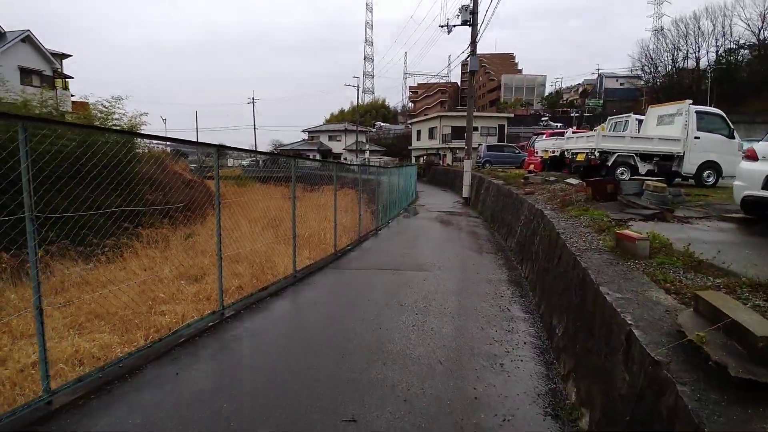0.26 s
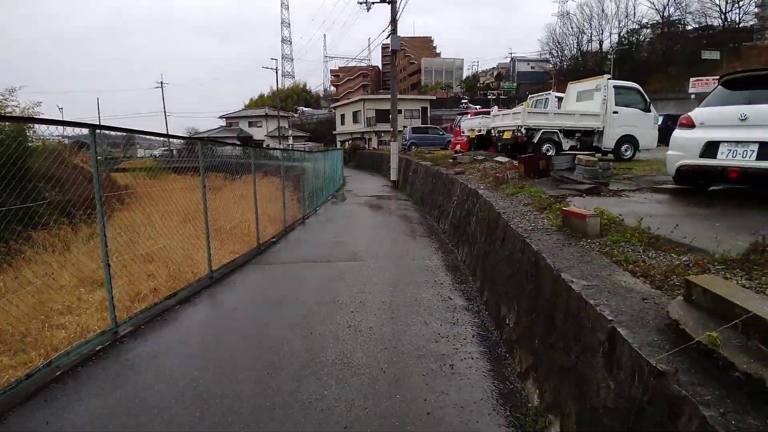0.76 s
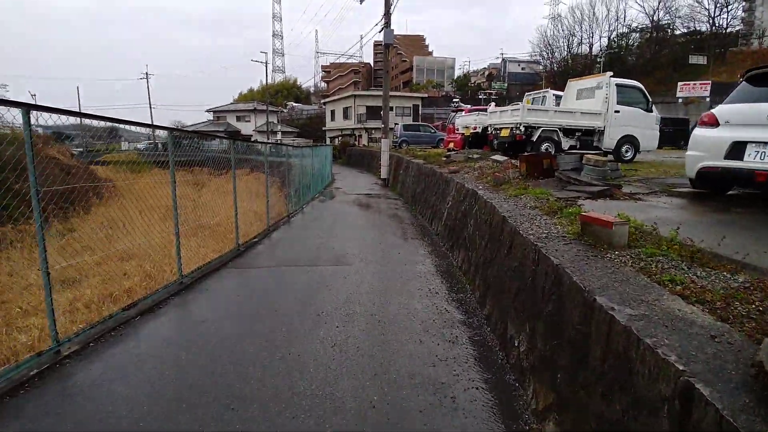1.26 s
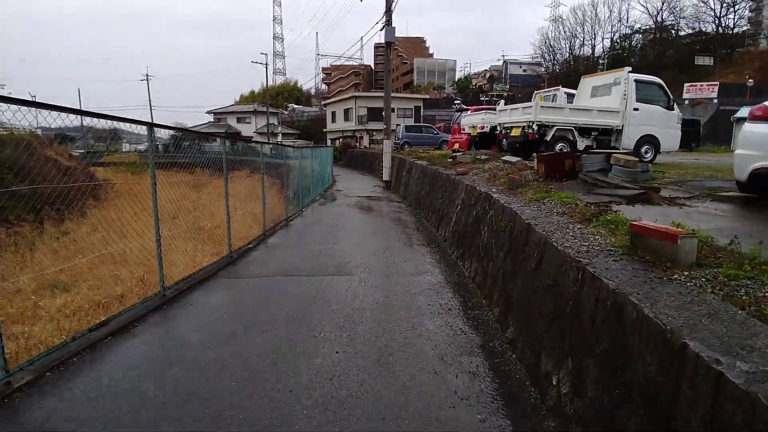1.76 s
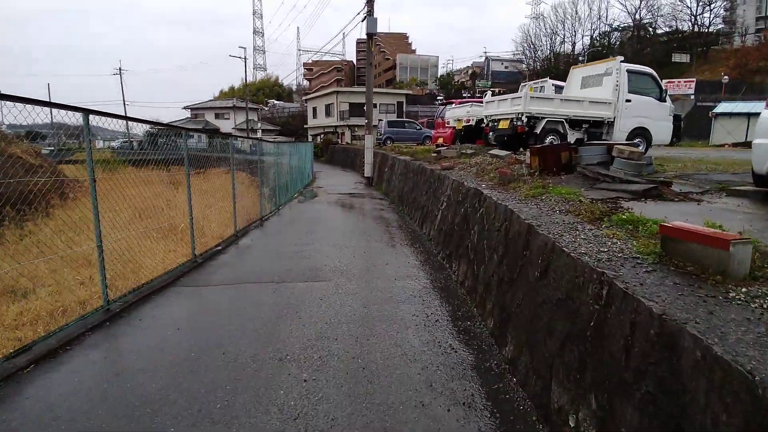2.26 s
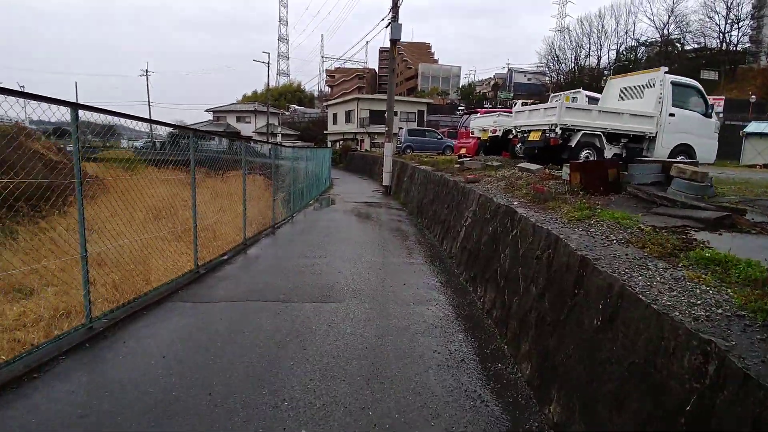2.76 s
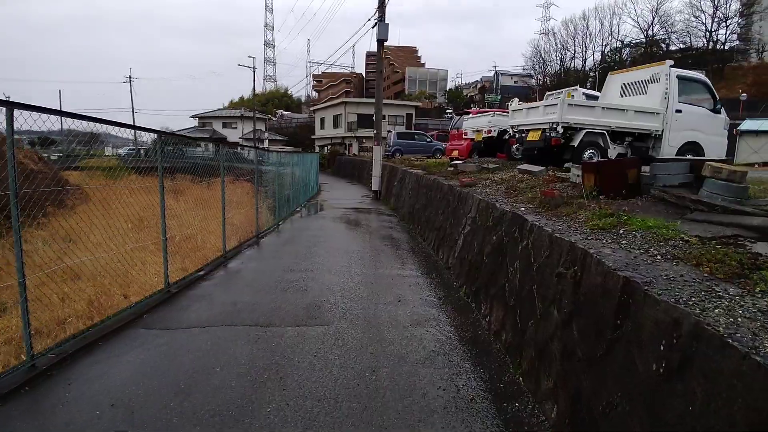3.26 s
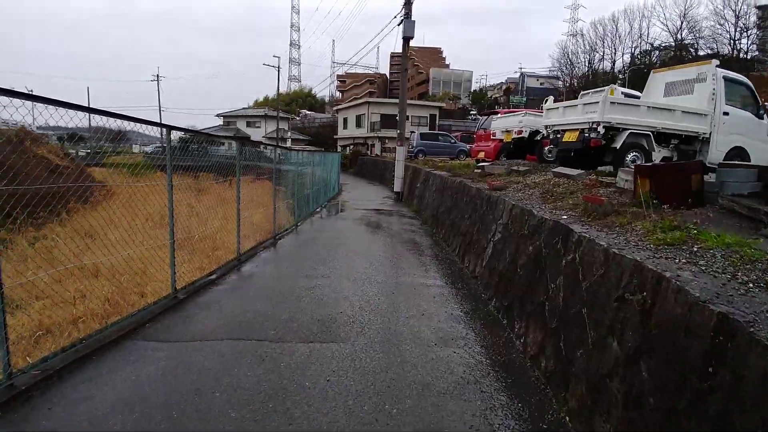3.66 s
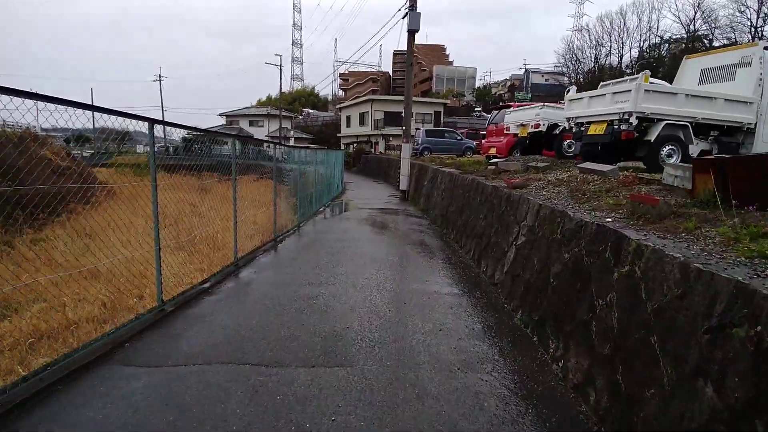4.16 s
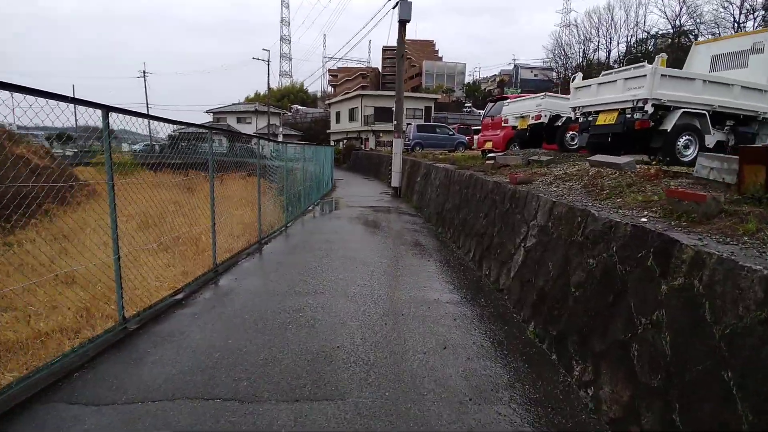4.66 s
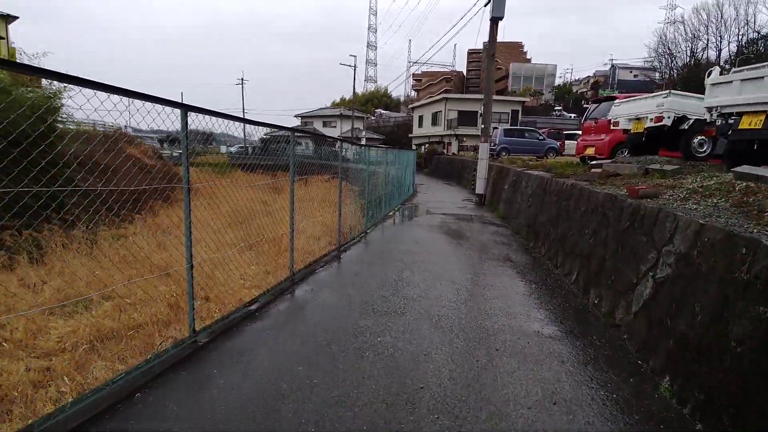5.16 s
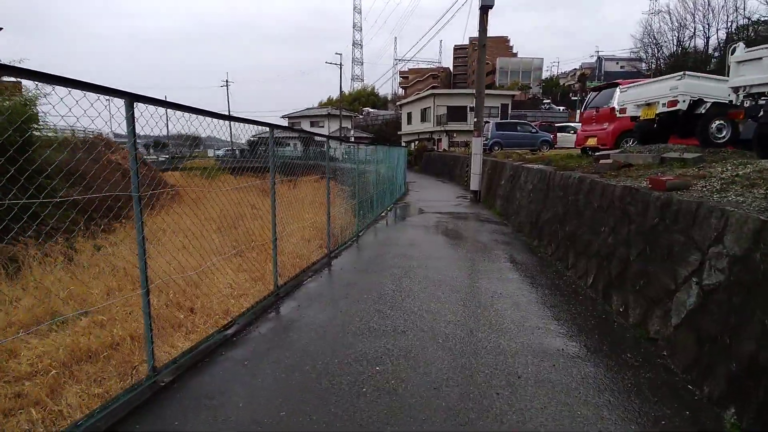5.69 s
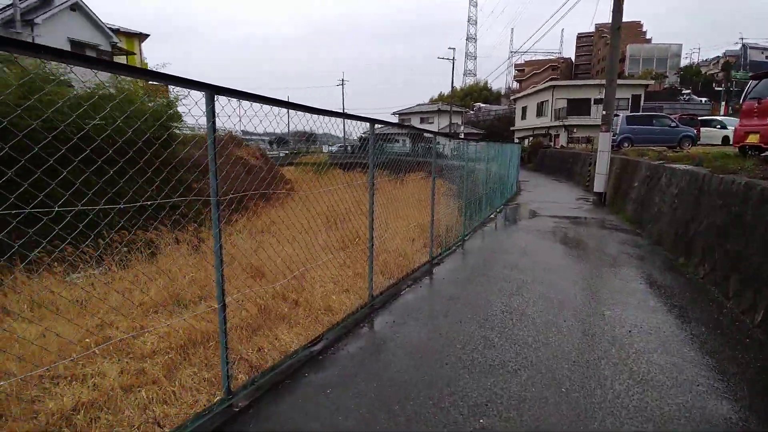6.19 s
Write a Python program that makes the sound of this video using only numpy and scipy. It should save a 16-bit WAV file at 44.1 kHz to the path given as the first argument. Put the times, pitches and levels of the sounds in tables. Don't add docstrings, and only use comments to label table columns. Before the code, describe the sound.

A handheld stereo microphone moves along a wet path in light rain. From 0 s a broad, low roar is already close, with rumble, a brief left-side wind buffet and heavy drops knocking on the casing. From about 0.9 s watery wash and bright spray grow, cresting around 2.1-2.3 s with short hollow swells and a strong knock. The rush then pulls away, losing its hiss by 3.5 s and gone by about 4.6 s. Throughout, a low springy thud with small ticks sounds on the left about every 0.6 s, at 0, 0.6, 1.3, 2.2, 2.8, 3.5, 4.0, 4.6, 5.2, 5.9 and 6.4 s, softer after 4 s. Soft sole pats and gritty scuffs accompany many steps. The quiet ending exposes crisp drops on the right, fewer on the left, fine pattering and faint town hum.

```python
import sys
import numpy as np
from scipy import signal
from scipy.fft import rfft, irfft, next_fast_len
from scipy.io import wavfile
from scipy.ndimage import uniform_filter1d, map_coordinates

SR = 44100
rng = np.random.default_rng(int(sys.argv[2]) if len(sys.argv) > 2 else 0)


def rack_gain(trim_db):
    fader = np.asarray(trim_db, float)
    return 10 ** (fader / 20)


def persist_wave(psi):
    counts = np.round(np.clip(psi, -1, 1) * 32767).astype(np.int16)
    wavfile.write(sys.argv[1], SR, np.atleast_2d(counts).T)


N = 283563

# t/s, roar level/dB as it nears and leaves, spray level/dB as it comes into the open
RUSH = [(0, -39, -75), (.3, -36.5, -70), (.52, -35.5, -69.5), (.6, -35, -74), (.81, -35, -70.5),
        (.91, -35, -59.5), (1.06, -34.5, -58), (1.3, -35.5, -46.5), (1.7, -37.5, -45), (2.08, -35.5, -38),
        (2.24, -35.5, -36.5), (2.59, -39.5, -42), (2.84, -40, -44), (3.06, -40.5, -44.5), (3.3, -46.5, -46),
        (3.56, -46, -53.5), (3.68, -50.5, -61.5), (3.83, -61.5, -64), (4.2, -58, -68), (4.5, -69, -65)]
# f/Hz, density/dB per Hz
SPRAY = [(3240, -35), (5500, -16), (5990, -1.5), (6610, -1), (10100, 3), (12700, -9), (15200, -32),
         (16000, -41)]
# f/Hz, correlation
RUSH_ALIKE = [(60, 0.85), (300, 0.98), (800, 0.87), (1200, 0.66), (2000, 0.85), (3000, 0.21), (9000, 0.45),
              (14000, .2)]
# f/Hz, level/dB
RUSH_BALANCE = [(60, 3), (110, 0.5), (200, 0), (380, -0.5), (700, 0.0), (1290, 2.5), (2380, -6.5),
                (4400, -14), (8120, -28.5), (15000, -22)]
# f/Hz, phase/rad
RUSH_LEAD = [(400, 0.22), (1100, -0.97), (2000, -2), (3000, -1.5), (14000, -2.5)]
PORTS = RUSH_ALIKE, RUSH_BALANCE, RUSH_LEAD


def unit(x):
    return x / np.sqrt(np.mean(x ** 2) + 1e-20)


def along(points, hz):
    f, v = np.transpose(points)
    return np.interp(np.log(hz + 1), np.log(f + 1), v)


def curves(rows):
    s, *cols = np.transpose(rows)
    return [np.interp(np.arange(N) / SR, s, c) for c in cols]


def wobble(rate):
    knots = rng.standard_normal(int(N * rate / SR) + 4)
    return map_coordinates(knots, [np.arange(N) * rate / SR])


def sides(pan_db):
    left = rack_gain(pan_db)
    return 2 * np.array([left, np.ones_like(left)]) / (1 + left)


def add(out, s, sound):
    k = round(s * SR)
    part = sound[:, max(-k, 0):][:, :N - max(k, 0)]
    out[:, max(k, 0):max(k, 0) + part.shape[1]] += part


def band(x, lo_hz, hi_hz):
    return signal.sosfilt(signal.butter(2, [lo_hz, hi_hz], "bandpass", fs=SR, output="sos"), x)


def rush(spectrum, alike, balance, lead, patchy_db, grain_db):
    grainy = rng.standard_normal((2, N)) * rack_gain(grain_db * wobble(450))
    z = signal.stft(grainy, nperseg=512)[2]
    field = uniform_filter1d(rng.standard_normal(z.shape[1:]), size=6, axis=0)
    field = uniform_filter1d(field, size=12, axis=1)
    pair = signal.istft(z * rack_gain(patchy_db * unit(field)), nperseg=512)[1][:, :N]
    m = next_fast_len(N + 8192)
    hz = np.fft.rfftfreq(m, 1 / SR)
    a, b = rfft(pair, m) * rack_gain(along(spectrum, hz))
    turn = np.arccos(np.clip(along(alike, hz), 0, 1)) / 2
    shared, own = a * np.cos(turn), b * np.sin(turn)
    shift = np.exp(.5j * along(lead, hz))
    ports = sides(along(balance, hz)) * [(shared + own) * shift, (shared - own) / shift]
    smooth = lambda v: uniform_filter1d(np.abs(v), size=999) + 1e-9
    ports *= smooth(a) / smooth(ports.mean(0))
    out = irfft(ports, m)[:, :N]
    return out / np.std(out.mean(0))


def drizzle():
    # f/Hz, density/dB per Hz
    floor_colour = [(76, -11), (130, 1), (172, -4.5), (238, 2.5), (363, -6.5), (511, -8), (863, -14.5),
                    (1320, -14), (1490, -16), (2890, -23.5), (4880, -26), (5620, -32), (9870, -26.5),
                    (12800, -33), (16000, -39)]
    # f/Hz, correlation
    quiet_alike = [(60, 0.49), (130, 0.64), (290, 0.94), (640, 0.26), (1410, -1.3), (3100, 0.35),
                   (6820, 0.081), (15000, -0.11)]
    # f/Hz, level/dB
    quiet_balance = [(60, 6.0), (110, -3), (200, 5.5), (380, -1), (700, 2), (1290, 1), (2380, -2.5),
                     (4400, -12), (8120, -15.5), (15000, -10)]
    roar_db, spray_db = curves(RUSH)
    lift_db = 0.098 * (roar_db - roar_db[-1]) + np.clip(spray_db - spray_db[-1], 0, 7)
    level_db = -59 + lift_db + 0.44 * wobble(2.85) + .5 * wobble(25)
    noise = rush(floor_colour, quiet_alike, quiet_balance, RUSH_LEAD, patchy_db=1.5, grain_db=2.0)
    return rack_gain(level_db) * noise


def hollow():
    # f/Hz, density/dB per Hz
    cavity = [(520, -34), (660, -10), (750, 2), (840, -12), (1050, -43)]
    # t/s, level/dB, half length/s
    cavity_swells = [
        (1.64, -47, .04),
        (1.772, -40, 0.049),
        (1.93, -49, .07),
        (2.062, -36.5, 0.063),
        (2.22, -46, 0.042),
        (2.292, -40, 0.027),
        (2.52, -47.5, .08),
        (2.85, -46.5, 0.065),
        (2.97, -46.5, .05),
        (3.205, -49, .1),
    ]
    now = np.arange(N) / SR
    swells = sum(rack_gain(db) * np.exp(-((now - s) / half) ** 2) for s, db, half in cavity_swells)
    return swells * rush(cavity, *PORTS, patchy_db=-1.0, grain_db=2.8)


def rumble():
    # f/Hz, density/dB per Hz
    low_colour = [(12, -54), (20, -46), (43, -13), (63, -9), (75, 4), (170, -9), (220, -27), (370, -120)]
    # t/s, level/dB, half length/s
    puff_times = [(0, -36, 0.018), (2.297, -46, 0.097), (2.743, -60, 0.046), (2.952, -51, 0.033),
                  (3.17, -62, 0.089), (3.3, -64, .06), (3.55, -56, 0.043), (3.72, -55.5, 0.031),
                  (3.92, -62, .05), (4.188, -65, 0.074), (4.71, -82, .12), (5.245, -66.5, 0.12),
                  (5.52, -72, .05), (5.63, -63, 0.057), (6.1, -68, 0.074), (6.27, -68, .05),
                  (.49, -46, .03), (1.4, -52, 0.041), (3.066, -53, 0.034), (2.0, -48.5, 0.057),
                  (1.15, -45, .03), (5.374, -66, .04), (5.78, -67, 0.051), (5.943, -57, 0.041),
                  (6.43, -62, 0.11)]
    now = np.arange(N) / SR
    far = rack_gain(np.maximum(-48 - 18.5 * np.clip(now - 1.94, 0, None), -73))
    puffs = sum(rack_gain(db) * np.exp(-((now - s) / half) ** 2) for s, db, half in puff_times)
    lumps = rack_gain(3.0 + 1.7 * wobble(12)) * np.hypot(far, puffs * sides(18)[:, None])
    alike, balance, lead = [(30, 0.14), (100, 0.94)], [(60, 0)], [(60, 0.0053)]
    return lumps * rush(low_colour, alike, balance, lead, patchy_db=-0.5, grain_db=1.5)


def plinks():
    # t/s, peak level/dB, pitch f/Hz
    ringing = [(.133, -54, 4600), (.5165, -45, 6000), (.595, -52, 6500), (.317, -43, 3000),
               (.438, -49, 3300), (.516, -38, 2600), (2.856, -32, 1800), (2.86, -33, 2500),
               (3.061, -35, 2750), (2.966, -39, 3000), (2.852, -32, 2230), (5.297, -51, 2500),
               (5.31, -52, 2200), (3.285, -42, 2500), (3.513, -35, 2260), (4.170, -55, 2500),
               (4.390, -57, 2200), (4.6536, -53, 1600), (4.677, -56, 2300), (4.8566, -52, 1700),
               (4.8945, -51, 4220), (4.980, -58, 2600), (5.342, -53, 1090), (5.352, -51, 1540),
               (5.482, -55, 2000), (5.591, -52, 1900), (5.972, -56, 1210), (6.308, -56, 1420),
               (6.403, -48, 1860)]
    # t/s, peak level/dB, pitch f/Hz
    heavy = [(0.478, -26, 700), (0.617, -20, 816), (0.646, -28, 864), (0.735, -25, 746), (0.82, -27, 1080),
             (0.852, -28, 880), (1.148, -25, 773), (1.311, -20, 713), (1.344, -22, 783), (1.398, -21, 1530),
             (1.478, -35.5, 633), (1.87, -27, 719), (2.041, -40, 716), (2.077, -16, 773), (2.176, -34, 689),
             (2.686, -31, 692), (2.911, -33, 711), (3.334, -38, 1040), (3.438, -38, 657), (3.563, -53, 694)]
    out, t = np.zeros((2, N)), np.arange(SR // 30) / SR
    for s, db, hz in ringing:
        decay = rack_gain(-60 * t * hz / 22)
        note = np.sin(2 * np.pi * hz * t) * decay * (1 - np.exp(-t * hz * 1.5))
        add(out, s, rack_gain(db + 1.5) * sides(-5)[:, None] * note)
    for s, db, hz in heavy:
        knock = np.sin(2 * np.pi * hz * t) * rack_gain(-60 * t * hz / 13.0)
        add(out, s, rack_gain(db - 8.0) * sides(1.5)[:, None] * knock)
    return out


def steps():
    # t/s, peak level/dB, pitch f/Hz, left over right level/dB
    contacts = [(0.48, -27, 297, 8), (1.396, -18, 467, -4), (2.859, -24, 700, 13), (3.07, -37, 280, -0.5),
                (3.64, -32, 252, 14), (3.903, -34.5, 130, 20), (3.907, -33, 433, 12), (4.067, -38, 213, 10),
                (4.154, -39, 118, 24), (4.209, -46, 118, 7), (4.635, -30.5, 500, 2.5),
                (4.637, -41, 1140, 0), (4.69, -40, 660, 3), (4.72, -42, 560, 4), (4.701, -37.5, 190, 16),
                (4.845, -40, 150, 12), (4.924, -42.5, 514, 1.0), (5.24, -47, 188, 12.5),
                (5.299, -37, 243, 2.5), (5.874, -33.5, 468, 2.5), (5.877, -46, 1200, 0),
                (5.949, -38, 111, 10)]
    # t/s, length/s, dull level/dB, bright level/dB
    scuffs = [(0, 0.019, -48, -64), (1.168, .035, -70, -51.5), (1.663, .014, -55, -45),
              (5.96, .02, -75, -70), (1.398, 0.019, -38.5, -44), (1.403, 0.027, -38, -48),
              (2.856, 0.011, -43, -62), (3.061, 0.0076, -36.5, -57), (3.647, 0.044, -52.5, -68),
              (4.059, 0.049, -58, -76), (4.243, 0.047, -83, -70), (4.628, 0.03, -61, -75),
              (4.588, .025, -65, -80), (5.218, .022, -65, -80), (5.842, .015, -62, -82),
              (6.374, .025, -65, -80), (5.293, 0.037, -58, -75), (5.302, 0.06, -72, -69),
              (5.24, 0.029, -64, -76), (5.856, 0.045, -59, -66.5), (6.358, .05, -72, -81)]
    # f/Hz, density/dB per Hz
    dull_grit = [(200, -14), (600, 2), (1300, -3.5), (2400, -4), (3300, -14), (4500, -17), (6500, -24),
                 (9000, -40)]
    out, t = np.zeros((2, N)), np.arange(SR // 12) / SR
    for s, db, hz, pan_db in contacts:
        decay = rack_gain(-60 * t * hz / 9)
        pat = np.sin(2 * np.pi * hz * t) * decay * (1 - np.exp(-t * hz * 3))
        add(out, s, rack_gain(db - 2.5) * sides(pan_db)[:, None] * pat)
    grit = np.array([rush(colour, *PORTS, patchy_db=2, grain_db=5) for colour in (dull_grit, SPRAY)])
    now = np.arange(N) / SR
    press = np.zeros((2, N))
    for s, length, *db in scuffs:
        press += rack_gain(db)[:, None] * np.sin(np.pi * np.clip((now - s) / length, 0, 1) ** .55)
    return out + (press[:, None] * grit).sum(0)


def right_drops():
    # t/s, peak level/dB, body level/dB, body f/Hz
    near = [(.1367, -47, 4, 1310), (.3158, -39, -4, 1480), (.4376, -43, -1, 1370), (1.6697, -37, 2, 1300),
            (2.8538, -39, 4, 2250), (2.9107, -33, -7, 1290), (3.1365, -28, -7, 2280),
            (3.6217, -36, 0, 2730), (3.6661, -39.5, 4.5, 2690), (3.697, -44.5, 2, 1320),
            (4.0627, -46, 0, 1410), (4.1924, -42.5, -3, 1270), (4.2128, -45, 0.5, 1580),
            (4.4454, -40, -3.5, 1280), (4.6112, -44, -1, 1500), (4.722, -38.5, -5.5, 1480),
            (4.7533, -51, 2, 1500), (4.9384, -53, 3, 1730), (5.0358, -48.5, 2, 1770),
            (5.1182, -47, -2, 1430), (5.162, -48, -2, 1950), (5.2964, -58, 12.5, 2420),
            (5.3066, -43, 0, 1500), (5.449, -50, 2.5, 1740), (5.573, -52, 4, 1420), (5.7433, -51, 1, 1450),
            (6.0348, -50, 5, 2020), (6.1485, -50.5, 5, 1800), (6.2477, -48, 0, 1450),
            (6.356, -46, -3, 1400)]
    # t/s, peak level/dB
    lighter = [(.2112, -45), (.4748, -43), (.5157, -50), (.5892, -43), (.7612, -47), (1.174, -42),
               (1.496, -28), (1.7459, -35), (3.0604, -39), (3.2714, -30), (3.8183, -41), (3.91, -43.5),
               (4.1265, -44), (4.2388, -43), (4.2657, -46), (4.2784, -51), (4.352, -46), (4.5496, -51),
               (4.821, -51), (4.9328, -42), (4.9444, -47), (4.9641, -49), (5.138, -49), (5.1836, -52),
               (5.5228, -51), (5.5824, -54), (5.8564, -45), (6.0442, -48), (6.2155, -48), (6.2503, -50),
               (.1216, -56), (.1326, -50), (.2044, -52), (.2484, -53), (.3655, -50), (.5432, -49),
                (.6044, -49), (.67, -54), (.68, -54), (.7705, -52), (.7871, -51), (4.2574, -54),
                (4.3011, -53), (4.335, -53), (4.3604, -54), (4.3894, -53), (4.6528, -51), (4.6718, -57),
                (4.68, -55), (4.7124, -55), (4.8264, -55), (4.9794, -51), (5.0244, -56), (5.1704, -53),
                (5.3514, -56), (5.4814, -59), (5.5904, -54), (5.6315, -51), (5.7244, -60), (5.8032, -52),
                (5.9894, -60), (6.0514, -52), (6.1014, -58), (6.3076, -57), (6.342, -53), (6.3684, -58),
                (6.4024, -60)]
    out, t = np.zeros((2, N)), np.arange(SR // 70) / SR
    to_peak = lambda v: v / np.abs(v).max(-1, keepdims=True)
    faint = rng.random((round(10 * N / SR), 2)) * [N / SR, 3] + [0, -67]
    light = np.vstack([lighter, faint])
    vary = rng.standard_normal((len(light), 2))
    body_dbs, body_hzs = -10 + 3 * vary[:, 0], 1450 * np.exp(.12 * vary[:, 1])
    every = np.vstack([near, np.c_[light, body_dbs, body_hzs]])
    burst = rack_gain(-60 * t / 0.0031) + 0.14 * rack_gain(-60 * t / 0.028)
    hiss = rng.standard_normal((len(every), 2, len(t))) * burst
    splats = to_peak(band(band(hiss[:, 0], 6700, 12300), 4500, 14500))
    fizzes = to_peak(band(hiss[:, 1], 700, 4200))
    for (s, db, body_db, hz), splat, fizz in zip(every, splats, fizzes):
        body = np.sin(2 * np.pi * hz * t) * rack_gain(-60 * t / 0.0078) + 1.23 * fizz
        add(out, s + 0.00036, rack_gain(db) * sides(-25)[:, None] * splat)
        add(out, s + 0.000966, rack_gain(db + body_db - 2.5) * sides(-12)[:, None] * body)
    return out


def fine_drops():
    when, size, sign = rng.random((round(110 * N / SR), 3)).T
    clicks = rack_gain(-56.5 + 13.0 * size ** 3) * np.sign(sign - .5)
    fine = np.bincount((when * N).astype(int), clicks, N)
    return band(band(fine, 2500, 11500), 1500, 13000) * sides(-16)[:, None]


def left_drops():
    # t/s, peak level/dB, pitch f/Hz, body level/dB
    housing_drops = [
        (1.5, -52, 9500, -17),
        (2.25, -41.5, 7000, -10),
        (2.89, -40, 8500, -4),
        (4.17, -38, 11000, -9),
        (4.784, -51, 11000, -13),
        (5.04, -56, 7500, -6),
        (5.392, -48, 10500, -10),
        (5.98, -60, 11000, -10),
    ]
    out, t = np.zeros((2, N)), np.arange(SR // 70) / SR
    for s, db, hz, body_db in housing_drops:
        tick = np.sin(2 * np.pi * hz * t) + rack_gain(body_db) * np.sin(2 * np.pi * 2200 * t)
        add(out, s, rack_gain(db - 60 * t / 0.0022) * (1 - np.exp(-t / .0001)) * tick * [[1], [.2]])
    return out


def sprung_mass():
    # t/s, level/dB
    swing_times = [(-.0036, -6), (0.6384, -5.5), (1.255, -4), (2.1607, -5), (2.785, -5), (3.452, -7),
                   (4.0404, -13), (4.5987, -15.5), (5.229, -16.5), (5.852, -15.5), (6.3818, -14)]
    out = np.zeros((2, N))
    t = np.arange(-SR // 50, SR // 4) / SR
    bell = lambda s, width: np.exp(-.5 * ((t - s) / width) ** 2)
    tone = lambda hz, s: np.cos(2 * np.pi * hz * (t - s))
    started = np.clip((t + .013) / .002, 0, 1)
    swing = .95 * started * bell(.0019, .0059) * tone(207, .0022)
    knock = -.09 * bell(0.00066, .0022) * tone(480, 0) + 0.038 * bell(0.0163, 0.0015) * tone(550, 0)
    late = np.clip(t - .013, 0, None)
    swell = 1 - np.exp(-late / .004)
    free = -.17 * swell * rack_gain(-60 * late / 0.037) * tone(196, .0206)
    drift = np.cumsum(rng.standard_normal(len(t))) / 90
    shell = 0.042 * swell * rack_gain(-60 * late / .5) * np.sin(2 * np.pi * 240 * late + drift)
    tick = lambda s: (t > s) * rack_gain(-60 * np.abs(t - s) / 0.0012) * np.sin(2 * np.pi * 1700 * (t - s))
    ticks = band(0.092 * tick(-0.014) + 0.24 * tick(0) + 0.099 * tick(0.015), 460, 3100)
    sound = swing + knock + free + shell
    for s, db in swing_times:
        add(out, s + t[0], (rack_gain(db) * sound + rack_gain(.4 * db - 8) * ticks) * [[1], [.004]])
    return out


def roar(gust):
    # f/Hz, density/dB per Hz
    coming = [(76, -25), (130, -2), (155, -5.5), (284, -1), (371, -7), (590, -7), (1200, -8.5), (1520, -10),
              (1810, -28.5), (2100, -27.5), (2730, -32), (4620, -120)]
    abreast = [(76, -37), (130, -11.5), (182, -11.5), (274, -1), (362, -8.5), (590, -6.5), (728, -5),
               (1550, -13.5), (1830, -24), (2100, -19.5), (2730, -28), (4620, -120)]
    leaving = [(76, -39), (130, -15), (178, -11), (244, 5.5), (322, -7), (431, 0), (597, -7.5), (737, -4),
               (1590, -17), (2100, -29), (2730, -74), (4620, -120)]
    # t/s, power share of coming, of abreast, of leaving
    stages = [
        (0, 1, 0, 0),
        (1.3, 1, 0, 0),
        (1.9, 0, 1, 0),
        (2.5, 0, 1, 0),
        (3.0, 0, 0, 1),
    ]
    roar_db, _ = curves(RUSH)
    noise = np.zeros((2, N))
    for share, colour in zip(curves(stages), (coming, abreast, leaving)):
        noise += np.sqrt(share) * rush(colour, *PORTS, patchy_db=1.5, grain_db=1.5)
    return rack_gain(roar_db + 1.5 + gust + 0.63 * wobble(23.71)) * noise


def wash(gust):
    # f/Hz, density/dB per Hz
    wash_colour = [(1060, -34), (1800, -13), (2000, -13), (2170, -4.5), (2390, -2.5), (2760, 2),
                   (3400, -12), (4420, -52), (7480, -120)]
    roar_db, spray_db = curves(RUSH)
    knee_db, soft_db = -59, 3.5
    under = soft_db * np.logaddexp(0, (knee_db - spray_db) / soft_db)
    wash_db = -48 - under + 0.14 * (spray_db - spray_db.max()) + 0.34 * (roar_db - roar_db.max())
    level = rack_gain(wash_db - 0.5 + gust + 0.5 * wobble(25.45))
    return level * rush(wash_colour, *PORTS, patchy_db=1.6, grain_db=2.0)


def mist(gust):
    # f/Hz, density/dB per Hz
    mist_colour = [(2800, -11.5), (3300, -2), (4300, -3.5), (5600, -2), (6600, -30)]
    now = np.arange(N) / SR
    _, spray_db = curves(RUSH)
    mist_db = -49.5 + 0.72 * (spray_db - spray_db.max()) - 1.67 * now
    haze = rack_gain(-69.5) * np.clip(now - 1.5, 0, 1)
    level = np.hypot(rack_gain(mist_db), haze) * rack_gain(1.5 + gust + 0.48 * wobble(30.4))
    return level * rush(mist_colour, *PORTS, patchy_db=0.6, grain_db=0.8)


def spray(gust):
    _, spray_db = curves(RUSH)
    level = rack_gain(spray_db - 0.5 + 0.77 * gust + 0.74 * wobble(39.77))
    return level * rush(SPRAY, *PORTS, patchy_db=1.27, grain_db=1.5)


def passing():
    gust = .5 * wobble(4.21) + 0.15 * wobble(13)
    gone = np.clip((4.6 - np.arange(N) / SR) / 0.77, 0, 1)
    return gone * (roar(gust) + wash(gust) + mist(gust) + spray(gust))


def scene():
    background = drizzle() + hollow() + rumble()
    rain = plinks() + right_drops() + fine_drops() + left_drops()
    return background + rain + steps() + sprung_mass() + passing()


def low_pass(x):
    return signal.sosfilt(signal.butter(12, 16460, fs=SR, output="sos"), x)


def record(dry):
    opened = dry * np.clip(np.arange(N) / (.0004 * SR), 0, 1)
    m = next_fast_len(N + 4096)
    passed = np.fft.rfftfreq(m, 1 / SR) < 15830
    kept = irfft(rfft(opened, m) * passed, m)[:, :N]
    return low_pass(kept)


dry = scene()
out = record(dry)
persist_wave(out)
```